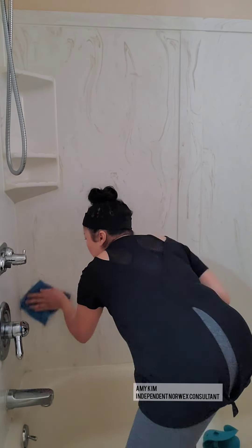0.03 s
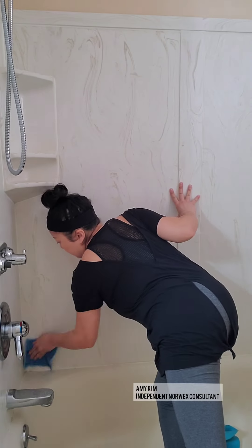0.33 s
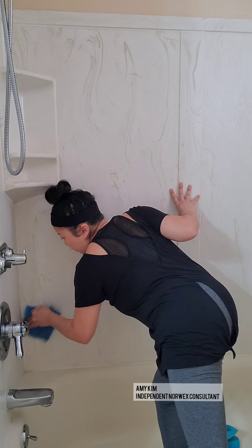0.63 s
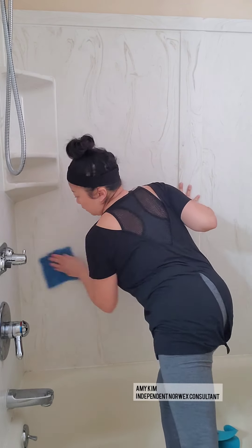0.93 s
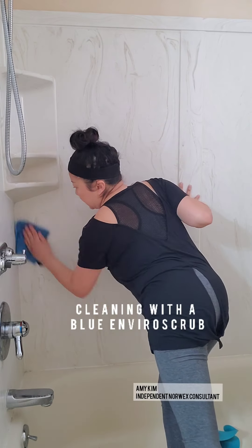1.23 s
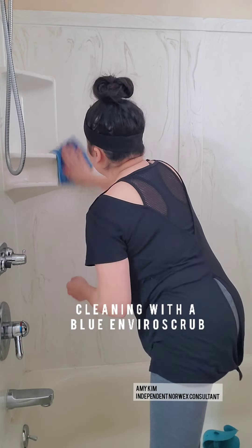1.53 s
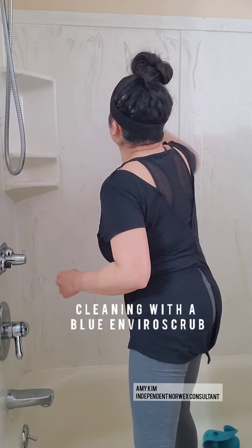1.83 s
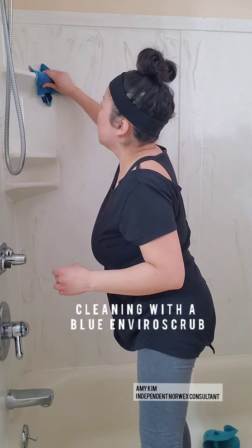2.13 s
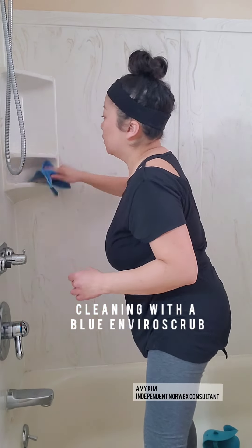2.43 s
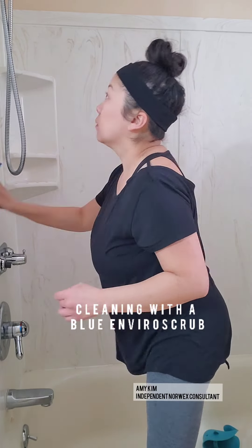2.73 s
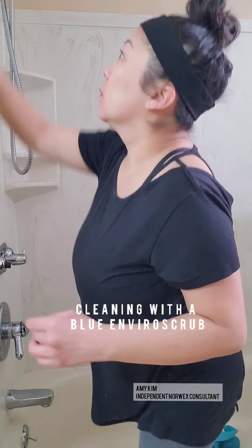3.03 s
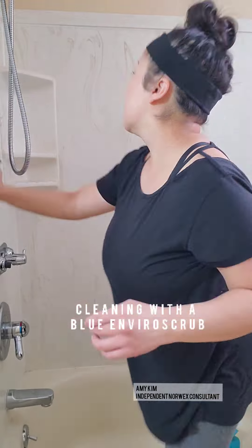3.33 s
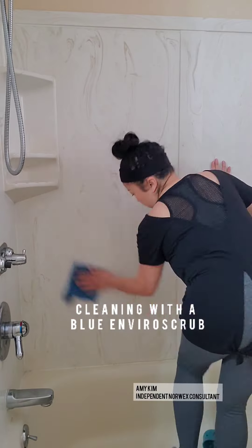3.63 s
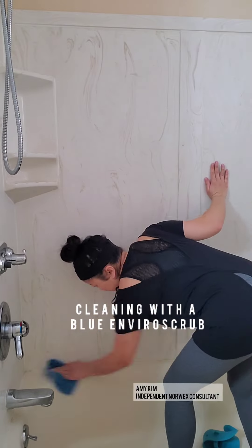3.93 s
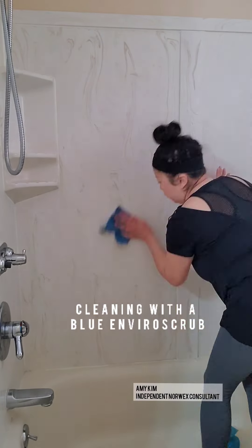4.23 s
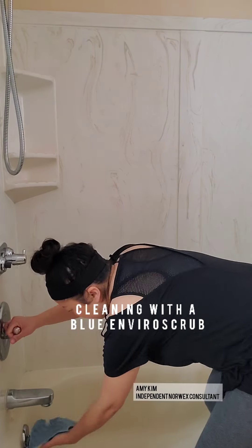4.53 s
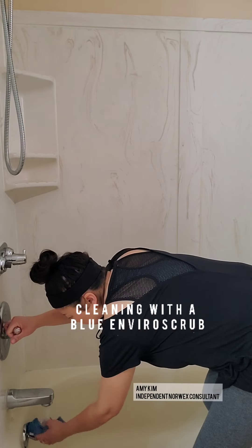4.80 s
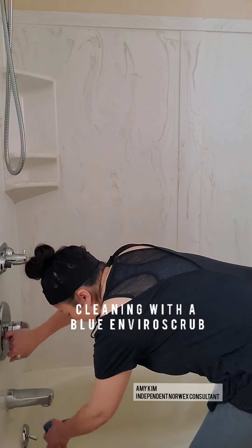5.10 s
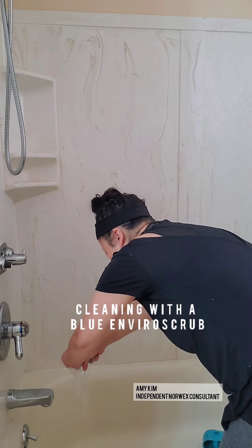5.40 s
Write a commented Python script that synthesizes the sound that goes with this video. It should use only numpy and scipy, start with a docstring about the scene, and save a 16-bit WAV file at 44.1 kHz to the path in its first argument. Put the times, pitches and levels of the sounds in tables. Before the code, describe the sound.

In a small bathroom, a short distance from the microphone, a scouring pad scratches softly back and forth across a shower wall. The plastic rumbles faintly and gives light knocks and a few louder hollow thumps. Then the sound switches suddenly to rinsing: tap water spatters on the pad and drums into the tub, and the pad is squeezed out in short squirts over faint background noise.

```python
"""A small bathroom, heard from a little way off. A scrub pad works over a plastic shower wall:
its fibres hiss as it sticks and slips, and it catches and bumps on the hollow panels, which boom.
At 4.47 s the scrubbing cuts off and rinsing follows: tap water sprays over the pad, gurgles and
drums in the tub, and the pad is wrung out in squirts. A faint background noise lies under both."""
import sys
import numpy as np
from scipy import signal
from scipy.fft import rfft, irfft, next_fast_len
from scipy.io import wavfile
from scipy.ndimage import uniform_filter1d

SR = 44100
rng = np.random.default_rng(int(sys.argv[2]) if len(sys.argv) > 2 else 0)


def bounce(signal):
    """Save signal as a 16-bit WAV file at the path given by the first command-line argument."""
    frames = np.transpose(np.atleast_2d(signal))
    limited = np.clip(frames, -1, 1)
    pcm = np.round(limited * 32767).astype(np.int16)
    wavfile.write(sys.argv[1], SR, pcm)


N = 245175
TIME = np.arange(N) / SR
SCRUB_END_S, RINSE_START_S = 4.473, 4.486
MIC_GAP_M, ROOM_T60_S, BACKGROUND_DB, TOP_HZ = .19, 0.21, -68.5, 15850

# Table levels are relative; the layers add their own gains.
# Pad strokes. Each row: start at full speed and length in seconds, then hiss level,
# rise over the stroke, treble boost and rub level in dB.
PAD_STROKES = [(0.0, 0.22, -51, -2.5, -3.5, -69), (0.221, 0.046, -52.5, 6, -7.5, -68),
               (0.29, 0.17, -61, -6, -5, -70), (0.434, 0.31, -60.5, -7, -4.5, -66.5),
               (0.618, 0.16, -54, -5.5, -12, -62), (0.759, 0.19, -53, 0, 0.5, -73.5),
               (0.975, 0.15, -60, 4.5, -1.5, -68), (1.118, 0.19, -53.5, -3, -17, -68.5),
               (1.294, 0.052, -53.5, 2.5, -0.5, -76), (1.474, 0.096, -53, 12, -3, -79.5),
               (1.605, 0.41, -48, -2.5, -3.5, -79), (2.115, 0.19, -71, 3, 6.5, -89),
               (2.297, 0.13, -77.5, 4, 4, -78), (2.518, 0.1, -70, 16, 8, -81.5),
               (2.578, 0.15, -60, 12.5, -6, -73.5), (2.765, 0.051, -53.5, 0, 2.5, -84),
               (2.842, 0.042, -60, 7, 2.5, -77), (2.891, 0.055, -57, -1, 0, -84),
               (2.967, 0.062, -57, -0.5, 0.5, -81), (3.092, 0.052, -58, -3, 6, -73.5),
               (3.16, 0.02, -54, -1, 0.5, -85), (3.207, 0.023, -53.5, -1, 1, -74),
               (3.275, 0.041, -52, 4.5, -1.5, -91), (3.542, 0.14, -58, 0.5, 5.5, -73),
               (3.713, 0.074, -55, -3.5, 2.5, -72), (3.803, 0.018, -53.5, 6, 4, -68),
               (3.828, 0.19, -61.5, -7, 0.5, -68), (4.047, 0.28, -58, -1.5, 6, -81.5),
               (4.296, 0.12, -51, 8.5, 1.5, -73.5)]
# Wall flexing under the hand. Each row: time in seconds, rumble in dB.
WALL_FLEX = [(0, -60), (.35, -75), (.7, -63.5), (1.25, -67.5), (1.45, -69), (1.9, -79), (2.3, -50.5),
             (2.45, -82), (2.75, -71.5), (3.45, -72), (3.9, -64.5), (4.47, -58)]
# Pad catches. Each row: centre and length in seconds, level in dB, scuff over fibre hiss in dB.
PAD_CATCHES = [(0.153, 0.017, -45, -7), (0.2, 0.018, -48, -10), (0.272, 0.018, -49, -6),
               (0.78, 0.048, -49.5, -4.5), (0.877, 0.042, -47, -9), (0.947, 0.012, -49, -15),
               (1.146, 0.026, -49.5, -3.5), (1.194, 0.03, -47, -4.5), (1.244, 0.019, -50, 2.5),
               (2.147, 0.027, -58.5, 2), (2.238, 0.025, -51, -0.5), (2.654, 0.0097, -64, 13),
               (3.165, 0.033, -55, -4.5), (3.378, 0.038, -70, 6.5), (3.742, 0.021, -58, 2.5)]
# Notes of the pad cupping on the wall, taut fibres rasping, water squirting through a gap, # and one short high
# drip tick among the squirts. # Each row: centre and length in seconds, start and end pitch in Hz, level in dB.
CUP_NOTES = [(.128, 0.025, 321.4, 337, -55), (.2, 0.024, 400, 428, -59.5), (.43, 0.04, 380, 357, -57),
             (.49, 0.1, 449, 455, -66), (.589, 0.018, 330, 345, -62), (.645, 0.057, 442.5, 397, -60),
             (.872, 0.02, 401, 423, -56), (1.06, 0.021, 800, 786, -59), (1.124, 0.026, 365, 402, -60),
             (1.37, 0.026, 364, 364, -64.5), (2.06, 0.033, 358.7, 320, -52.5), (2.29, 0.04, 950, 910, -68),
             (2.38, 0.041, 1640, 1500, -77.5), (3.033, 0.017, 350, 377, -51.5),
             (3.078, 0.037, 339.3, 315, -59), (3.117, 0.022, 900, 894, -64), (3.22, 0.046, 880, 955, -61.5),
             (3.428, 0.029, 394, 446, -62)]
RASP_NOTES = [(2.848, 0.028, 8950, 9300, -56)]
SQUIRT_NOTES = [(4.507, 0.031, 2088, 1874, -41.5), (4.722, 0.014, 3310, 3230, -39.5),
                (4.765, 0.044, 3860, 3576, -38.5), (4.955, 0.032, 5870, 6310, -38),
                (5.055, 0.041, 5040, 5330, -39.5), (5.158, 0.025, 4740, 3960, -36.5),
                (5.186, 0.018, 2800, 2414, -35), (5.186, 0.021, 1888, 1700, -43.5),
                (5.21, 0.036, 3820, 3435, -38), (5.306, 0.016, 10000, 9700, -55),
                (5.412, 0.051, 1700, 1794, -44.5), (5.505, 0.03, 5730, 5460, -40),
                (5.553, 0.022, 1903, 1670, -38)]
# Bumps on the wall. Each row: start in seconds, ring peak in dB, favoured pitch in Hz,
# thud and scuff in dB.
WALL_BUMPS = [(1.666, -39, 90, -50, -54), (2.04, -41.5, 73, -58, -78), (2.129, -43, 56.5, -53, -92),
              (2.224, -14.5, 93, -42, -53), (2.455, -46.5, 143, -58.5, -69.5), (2.555, -49, 82, -80, -80),
              (2.641, -44, 148, -46, -58.5), (2.693, -18, 74, -42, -65), (2.887, -53.5, 80, -74, -85),
              (3.017, -51, 94.2, -56.5, -87.5), (3.06, -40.5, 80.7, -56, -83), (3.271, -44, 80.7, -73, -64),
              (3.405, -49, 70.0, -58, -81), (3.525, -38.5, 88, -51, -69), (3.562, -41.5, 76, -58, -62.5),
              (3.822, -44, 72.7, -61.5, -60.5), (4.033, -40, 74, -86, -81), (4.126, -37.5, 79, -81, -77),
              (4.195, -23.5, 227, -41.5, -56.5), (4.293, -47, 84, -53.5, -69),
              (4.404, -42.5, 120, -51.5, -61), (5.099, -20.5, 104, -32.5, -64)]
# Wall panel modes. Each row: frequency in Hz, level in dB, T60 in seconds.
PANEL_MODES = [(51.3, -1, 0.1), (81.5, 13.5, 0.12), (120, -27, 0.04), (192, 3, 0.049), (199, 4.5, 0.097),
               (357, -14, 0.057)]
# Resonances of the rubbed wall, running spout and hollow tub.
# Each row: frequency and width in Hz, level in dB.
WALL_MODES = [(180, 57, -6), (414, 89, -7), (584, 380, -7.5), (764, 120, -6.5), (1500, 1200, -12)]
SPOUT_MODES = [(305.7, 6.9, 2), (552, 34, -4), (825, 12, 1), (1171, 11, 1)]
TUB_MODES = [(80.7, 7.8, 1.5), (153, 49, -14), (213, 12.3, -3.5), (299, 23, -21), (430.5, 20, -11.5)]
# Stream hitting the pad. Each row: start at full flow and length in seconds, then spray level,
# rise over the gush and treble boost in dB.
PAD_GUSHES = [(4.502, 0.061, -49, -2, 2), (4.57, 0.1, -46, -8, 4), (4.693, 0.081, -37.5, 5, 7),
              (4.798, 0.058, -38.5, 0.5, 8), (4.868, 0.259, -41.5, 3, 12.5), (5.15, 0.051, -34, -4.5, 9),
              (5.292, 0.074, -59.5, 11, 12), (5.381, 0.038, -40.5, 11.5, 4), (5.456, 0.062, -32, -6.5, 10),
              (5.52, 0.05, -40.5, -4, 13)]
# Stream landing, in two lists read as one curve. Each row: time in seconds, gurgle and drumming in dB.
STREAM_LANDING = [
    [(4.49, -48, -49), (4.63, -53.5, -58.5), (4.666, -51.5, -46.5), (4.71, -51.5, -49), (4.742, -44, -50),
     (5.066, -48, -47), (5.09, -43, -42), (5.112, -47, -34)],
    [(5.15, -58, -47.5), (5.18, -59, -44), (5.275, -66, -57.5), (5.355, -66.5, -57), (5.385, -52.5, -52.5),
     (5.45, -63, -47), (5.48, -57, -34), (5.512, -53, -43.5), (5.56, -60, -43)],
]
# Noise spectra. Each row: frequency in Hz, density in dB.
FIBRE_SPECTRUM = [(650, -17.5), (1100, -14), (1180, -12.5), (1490, -10), (2050, -9), (3750, 0),
                  (4530, -0.5), (5070, -1), (6850, -0.5), (8090, -6.5), (9780, -0.5), (11200, -6),
                  (15100, -4.5), (15800, -10)]
SCUFF_SPECTRUM = [(200, -10.5), (500, 2.5), (800, 5.5), (1300, 4), (2200, 1), (5000, -0.5), (15000, -34)]
THUD_SPECTRUM = [(110, 2.5), (190, 6), (250, -4), (315, -1.5), (440, -5), (620, -10), (1200, -25.5),
                 (3000, -60)]
SPRAY_SPECTRUM = [(760, -38), (1300, -33), (1360, -21), (1850, -11), (2190, -6.5), (2310, -2), (3030, 2),
                  (4280, 3), (4650, 0.5), (6850, -0.5), (7760, -7.5), (9980, -3.5), (11200, -11),
                  (12600, -9), (15800, -13)]
GURGLE_SPECTRUM = [(120, 3), (250, -8.5), (450, -4), (750, -0.5), (1100, -2.5), (1500, -5), (2300, -7),
                   (4500, -23.5)]
BACKGROUND_SPECTRUM = [(18, -53), (30, 18.5), (93, 8), (238, -6.5), (500, -13), (1100, -9), (1400, -21),
                       (3830, -16.5), (6830, -11), (15800, -22)]
# Balance of two microphone ports. Each row: frequency in Hz, left minus right in dB.
PORT_BALANCE = [(150, -2), (500, 3.5), (1200, 5.5), (4500, 5.5), (5900, 10.5), (7000, 13.5), (8100, 15),
                (8800, 2.5), (9600, 0.5), (11000, 2), (12000, 2.5), (15000, 10)]


def undb(db):
    """Decibels to gain."""
    return 10 ** (np.asarray(db) / 20)


def unit(x):
    """Scale stereo to a mid rms of 1."""
    return x / np.sqrt(np.mean(x.mean(0) ** 2))


def controls(table):
    """Columns of a timed table, interpolated per sample."""
    times_s, *columns = np.transpose(table)
    return [np.interp(TIME, times_s, column) for column in columns]


def filtered(x, response):
    """Apply a frequency response, a function of Hz."""
    size = next_fast_len(x.shape[-1] + SR // 4)
    hz = np.maximum(np.arange(size // 2 + 1) * SR / size, 1)
    return irfft(rfft(x, size) * response(hz), size)[..., :x.shape[-1]]


def spectrum_db(points, hz):
    """Read (Hz, dB) points on a log-frequency axis."""
    points_hz, db = np.transpose(points)
    return np.interp(np.log(hz), np.log(points_hz), db)


def colour(x, points):
    """Impose a spectrum, rolled off below its first point."""
    gain = lambda hz: undb(spectrum_db(points, hz)) * np.minimum(hz / points[0][0], 1) ** 2
    return unit(filtered(x, gain))


def resonate(x, modes):
    """Ring parallel (Hz, width Hz, dB) resonances."""
    gain = lambda hz: sum(undb(db) / (1 + 1j * (hz / f - f / hz) * f / width) for f, width, db in modes)
    return unit(filtered(x, gain))


def muffle(x, edge_hz):
    """Steep low-pass."""
    return filtered(x, lambda hz: 1 / (1 + (hz / edge_hz) ** 4))


def brighten(x, treble_db):
    """Shelf above 7.5 kHz."""
    treble = filtered(x, lambda hz: 1 / (1 + (7500 / hz) ** 4))
    return x + (undb(treble_db) - 1) * treble


def walk(rate_hz):
    """Smooth random wander within +-2."""
    hold = max(int(SR / rate_hz), 2)
    steps = np.repeat(rng.uniform(-1, 1, N // hold + 1), hold)
    return 2 * uniform_filter1d(steps, hold)[:N]


def shifting(x, depth_db, rate_hz):
    """Octaves swell and fade independently as the contact patch changes."""
    log_centres = np.log(250 * 2. ** np.arange(7))
    octaves = (filtered(x, lambda hz: np.interp(np.log(hz), log_centres, pick)) for pick in np.eye(7))
    return sum(octave * undb(depth_db * walk(rate_hz)) for octave in octaves)


def swell(centre_s, length_s):
    """Gaussian rise and fall."""
    return np.exp(-(2 * (TIME - centre_s) / length_s) ** 2)


def gestures(starts_s, lengths_s, levels_db, rises_db, attack_db_per_s, arch_db, release_db_per_s):
    """Gain of a run of movements: attack, sloped and arched hold, release. The loudest wins."""
    level_db = -np.inf
    for start_s, length_s, db, rise_db in zip(starts_s, lengths_s, levels_db, rises_db):
        age_s = TIME - start_s
        position = np.clip(age_s / length_s, 0, 1) - .5
        hold_db = db + rise_db * position - arch_db * (2 * position) ** 2
        attack_db = attack_db_per_s * np.minimum(age_s, 0)
        release_db = release_db_per_s * np.maximum(age_s - length_s, 0)
        level_db = np.maximum(level_db, hold_db + attack_db - release_db)
    return undb(level_db)


def diffuse(size=N):
    """Noise from all sides: channels alike in the bass, unrelated in the treble."""
    mid, side = rng.standard_normal((2, size))
    coherence = lambda hz: .93 * np.sinc(2 * hz * MIC_GAP_M / 343)
    mid = filtered(mid, lambda hz: np.sqrt(1 + coherence(hz)))
    side = filtered(side, lambda hz: np.sqrt(1 - coherence(hz)))
    return unit(np.array([mid + side, mid - side]))


def bathroom(x, tail_db):
    """Tight near reflections plus a short room tail."""
    t = TIME[:SR // 4]
    near, tail = np.exp(-t / 0.0059), np.exp(-np.log(1000) * t / ROOM_T60_S)
    decay = near / np.linalg.norm(near) + undb(tail_db) * tail / np.linalg.norm(tail)
    return unit(signal.fftconvolve(x[None], diffuse(len(t)) * decay, axes=1)[:, :N])


def patter(rate_hz, spread_db, tail_db, spots=10):
    """Tiny random impacts, a few strong, at spots with their own room paths."""
    out = 0
    for _ in range(spots):
        clicks = (rng.random(N) < rate_hz / spots / SR) * rng.choice([-1, 1], N)
        strength_db = spread_db * np.minimum(rng.exponential(size=N), 4)
        out += bathroom(clicks * undb(strength_db), tail_db)
    return unit(out)


def scrubbing(slip_hz=43):
    """Stiff fibres flick over the wall; the pad sticks and slips, and rubs the wall into resonance."""
    start_s, length_s, hiss_db, rise_db, treble_db, rub_db = np.transpose(PAD_STROKES)
    stroke = lambda db: gestures(start_s, length_s, db, rise_db,
                                 attack_db_per_s=750, arch_db=1, release_db_per_s=318)
    treble_db = np.interp(TIME, start_s + length_s / 2, treble_db)
    slip_phase = np.cumsum(slip_hz * (1 + 0.15 * walk(32))) / SR % 1
    # each slip starts sharply and dies away
    judder = 1.36 * walk(60) + 0.2 * walk(320) + 1.16 * (1 - 2 * slip_phase)
    fibres = undb(-1) * patter(rate_hz=4500, spread_db=1.2, tail_db=-0.27) + undb(-5) * diffuse()
    hiss = brighten(colour(fibres, FIBRE_SPECTRUM), treble_db)
    hiss = shifting(hiss, depth_db=0.99, rate_hz=30) * stroke(hiss_db)
    rub = muffle(resonate(diffuse(), WALL_MODES), edge_hz=2360)
    rub = shifting(rub, depth_db=2.1, rate_hz=29.4) * stroke(rub_db)
    return hiss * undb(1.16 * judder) + rub * undb(3.5 + 2 * judder)


def wall_rumble():
    """The wall flexes under the hand in two low modes."""
    flex_db, = controls(WALL_FLEX)
    rumble = resonate(diffuse(), [(72.3, 24, 1.0), (171.5, 49, -9)])
    return muffle(rumble, edge_hz=246) * undb(flex_db + 3.6 * walk(23))


def catches():
    """The pad snags and lets many fibres go at once, with a fuller scuff."""
    snag = colour(patter(rate_hz=4000, spread_db=0.87, tail_db=-1), FIBRE_SPECTRUM)
    scuff = colour(diffuse(), SCUFF_SPECTRUM)
    return sum(undb(db - 3) * swell(centre_s, length_s) * (snag + undb(scuff_db) * scuff)
               for centre_s, length_s, db, scuff_db in PAD_CATCHES)


def gliding_notes(table, half_width_hz):
    """A pocket, fibre or gap sounds one noisy, sliding resonance; width is a function of start pitch."""
    out = 0
    for centre_s, length_s, start_hz, end_hz, db in table:
        hz = np.interp(TIME, [centre_s - length_s / 2, centre_s + length_s / 2], [start_hz, end_hz])
        lowpass = signal.butter(2, half_width_hz(start_hz), fs=SR, output="sos")
        churn = unit(signal.sosfilt(lowpass, rng.standard_normal((2, N))))
        carrier = np.sqrt(2) * np.sin(2 * np.pi * np.cumsum(hz) / SR)
        out += undb(db) * swell(centre_s, length_s) * churn * carrier
    return out


def bumps(push_s=0.015, thud_s=0.008, scuff_s=0.0085):
    """The soft pad pushes the panel into its modes; where it lands decides which speak."""
    thud, scuff = colour(diffuse(), THUD_SPECTRUM), colour(diffuse(), SCUFF_SPECTRUM)
    out = np.zeros((2, N))
    for start_s, peak_db, favoured_hz, thud_db, scuff_db in WALL_BUMPS:
        start = int(start_s * SR)
        span = slice(start, min(start + SR // 3, N))
        t = TIME[:span.stop - start]
        ring = 0
        for hz, db, t60_s in PANEL_MODES:
            weight = undb(db) * np.exp(-(np.log(hz / favoured_hz) / 0.8) ** 2)
            ring += weight * undb(-60 * t / t60_s) * np.cos(2 * np.pi * hz * (t - .012))
        ring *= np.sin(np.pi / 2 * np.minimum(t / push_s, 1)) ** 3
        contact = lambda tau_s: (t / (2 * tau_s)) ** 2 * np.exp(2 - t / tau_s)
        out[:, span] -= undb(peak_db - 1) * ring / np.abs(ring).max()
        out[:, span] += undb(thud_db) * thud[:, span] * contact(thud_s)
        out[:, span] += undb(scuff_db - 1) * scuff[:, span] * contact(scuff_s)
    return out


def bubbles(count=1400, cycles=14, glide=0.07):
    """Small trapped bubbles, each a short ring rising in pitch."""
    out = np.zeros(N + SR)
    for when, decades in rng.random((count, 2)):
        hz = 700 * 10 ** decades
        age = np.arange(int(2 * cycles * SR / hz)) * hz / SR / cycles
        start = int((RINSE_START_S + when * (N / SR - RINSE_START_S)) * SR)
        ring = np.sin(2 * np.pi * cycles * age * (1 + glide * age / 2))
        out[start:start + len(age)] += ring * np.exp(-3 * age)
    return out[:N]


def tap_spray():
    """The stream breaks on the pad into fine drops and fat spatters, and traps bubbles."""
    start_s, length_s, spray_db, rise_db, treble_db = np.transpose(PAD_GUSHES)
    flow = gestures(start_s, length_s, spray_db, rise_db,
                    attack_db_per_s=800, arch_db=0.5, release_db_per_s=402)
    treble_db = np.interp(TIME, start_s + length_s / 2, treble_db)
    drops = undb(-1) * patter(rate_hz=3500, spread_db=3.5, tail_db=-0.8) + undb(-1) * diffuse()
    fizz = undb(-10) * bathroom(bubbles(), tail_db=-1.7)
    spatters = undb(-7) * patter(rate_hz=120, spread_db=4.7, tail_db=0)
    spray = brighten(colour(drops + fizz + spatters, SPRAY_SPECTRUM), treble_db)
    return shifting(spray, depth_db=1.0, rate_hz=60) * flow * undb(-3 + 1.05 * walk(160))


def tap_stream():
    """Running water rings the spout, gurgles and drums on the hollow tub."""
    gurgle_db, drum_db = controls(np.vstack(STREAM_LANDING))
    gurgle = undb(1.5) * shifting(colour(diffuse(), GURGLE_SPECTRUM), depth_db=3.5, rate_hz=50)
    spout = undb(-5) * resonate(diffuse(), SPOUT_MODES)
    drum = muffle(resonate(diffuse(), TUB_MODES), edge_hz=830)
    return (gurgle + spout) * undb(gurgle_db) + drum * undb(drum_db + 1)


def scene():
    """Scrubbing, 13 ms of silence, rinsing; bumps and background in both parts."""
    scrub_gate = np.clip((SCRUB_END_S - TIME) / 0.0014, 0, 1)
    rinse_gate = TIME > RINSE_START_S
    background = colour(diffuse(), BACKGROUND_SPECTRUM) * undb(BACKGROUND_DB)
    cupping = gliding_notes(CUP_NOTES, half_width_hz=lambda hz: 75)
    rasp = gliding_notes(RASP_NOTES, half_width_hz=lambda hz: 450)
    squirts = gliding_notes(SQUIRT_NOTES, half_width_hz=lambda hz: 0.18 * hz)
    scrub = scrubbing() + wall_rumble() + catches() + cupping + rasp
    rinse = tap_spray() + tap_stream() + squirts
    return scrub_gate * scrub + rinse_gate * rinse + (scrub_gate + rinse_gate) * (background + bumps())


def record(dry, bass_lead_rad=0.25):
    """Two microphone ports colour the sound differently, left leading in the bass; steep top cut."""
    sides = np.array([[-1], [1]])
    balance = lambda hz: np.sqrt(2 / (1 + undb(sides * spectrum_db(PORT_BALANCE, hz)) ** 2))
    phase = lambda hz: np.exp(-.5j * sides * bass_lead_rad / (1 + (hz / 300) ** 2))
    ported = filtered(dry, lambda hz: balance(hz) * phase(hz))
    return signal.sosfilt(signal.ellip(12, .1, 80, TOP_HZ, fs=SR, output="sos"), ported)


dry = scene()
out = record(dry)
bounce(out)
```